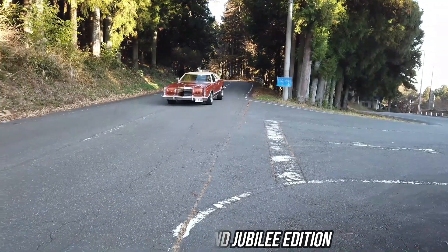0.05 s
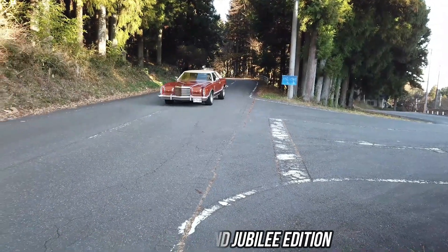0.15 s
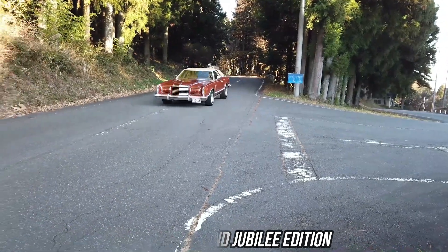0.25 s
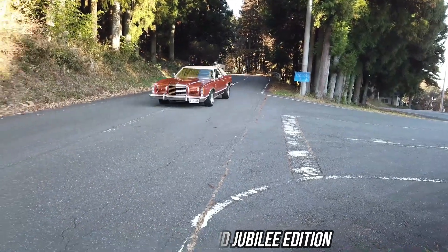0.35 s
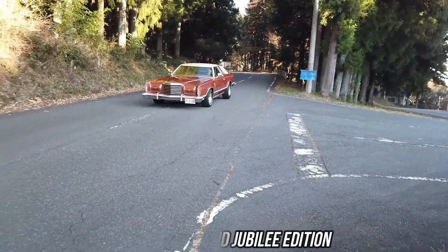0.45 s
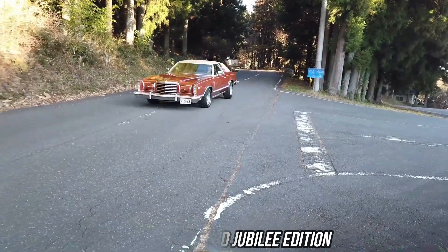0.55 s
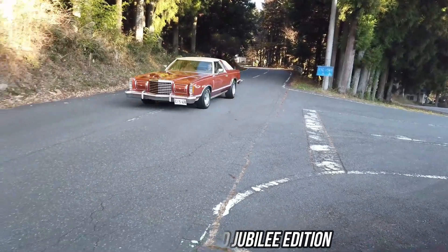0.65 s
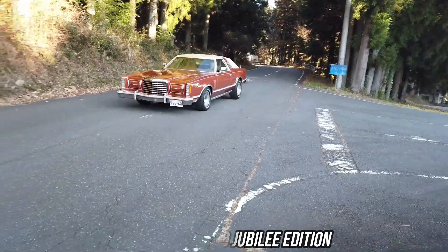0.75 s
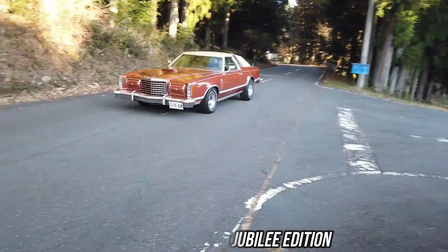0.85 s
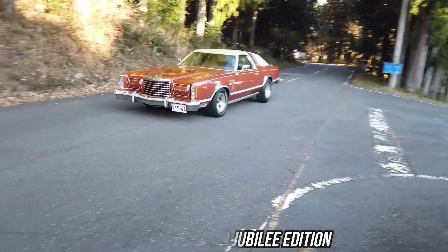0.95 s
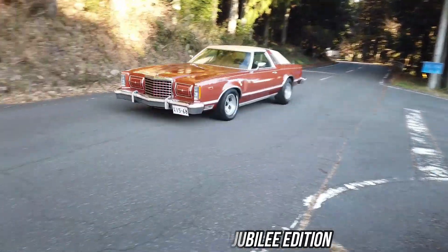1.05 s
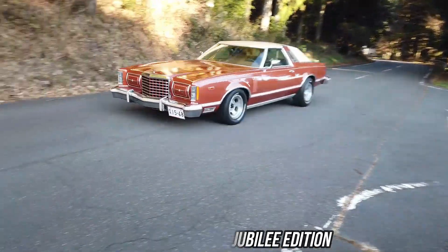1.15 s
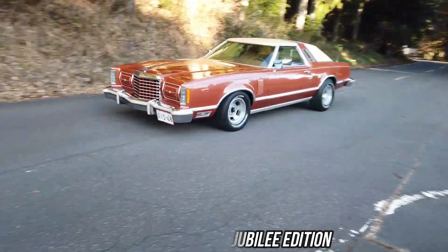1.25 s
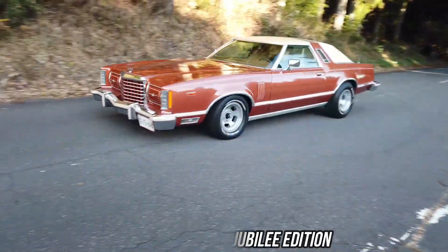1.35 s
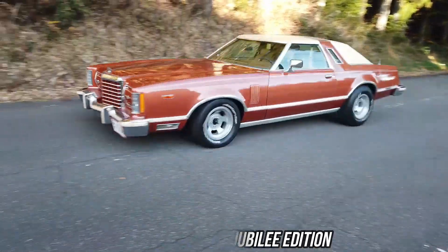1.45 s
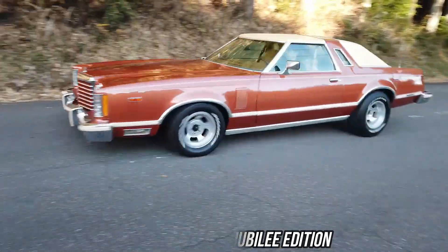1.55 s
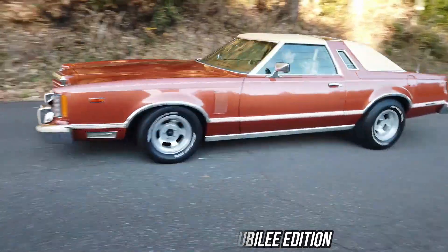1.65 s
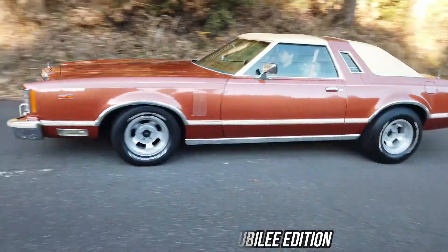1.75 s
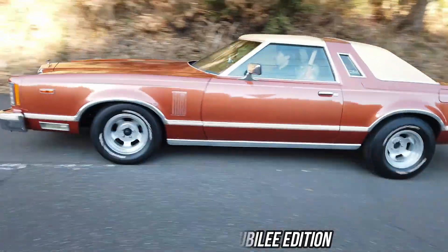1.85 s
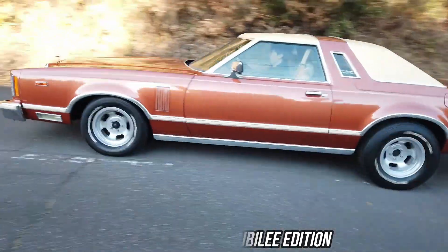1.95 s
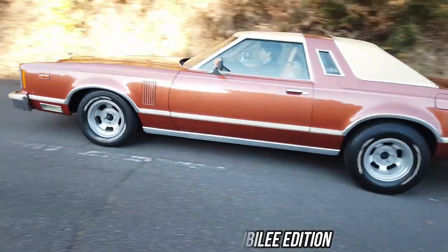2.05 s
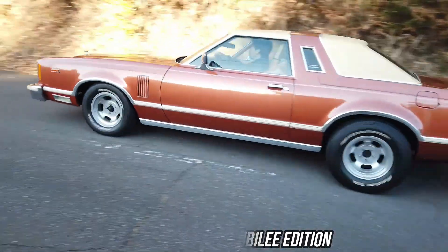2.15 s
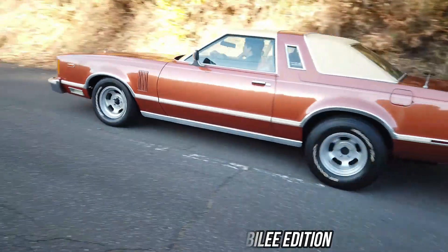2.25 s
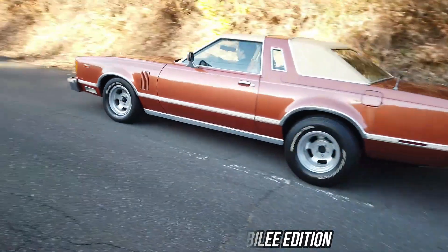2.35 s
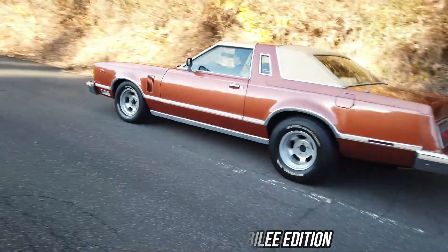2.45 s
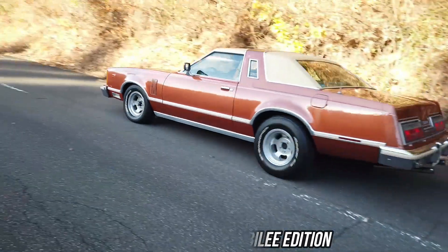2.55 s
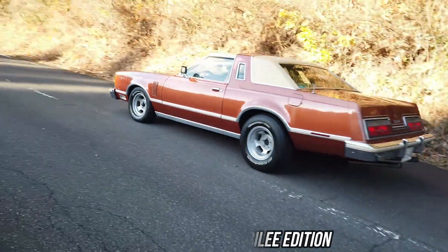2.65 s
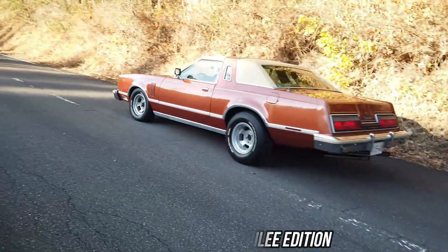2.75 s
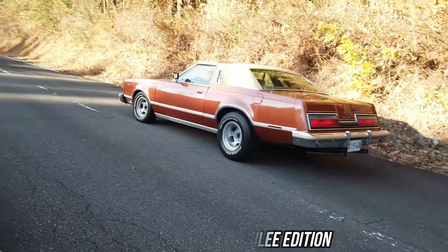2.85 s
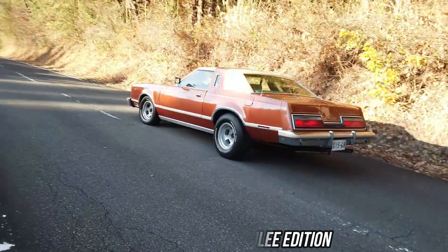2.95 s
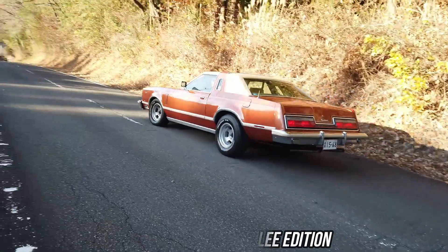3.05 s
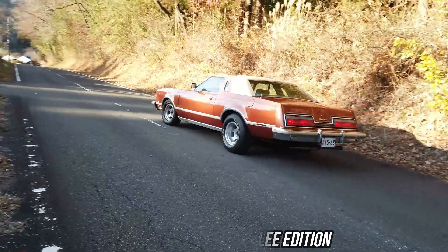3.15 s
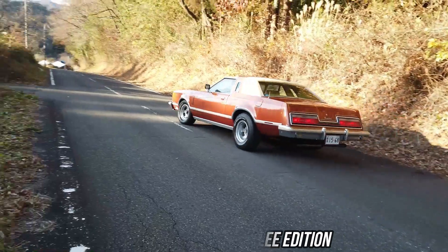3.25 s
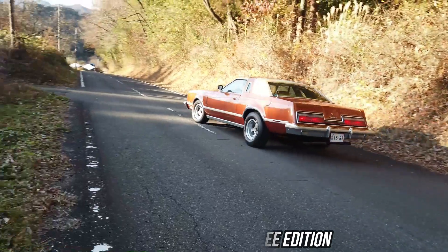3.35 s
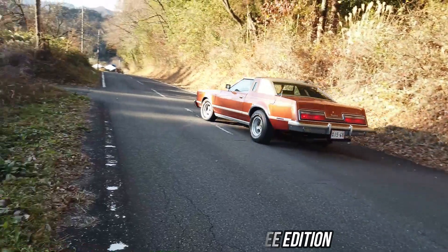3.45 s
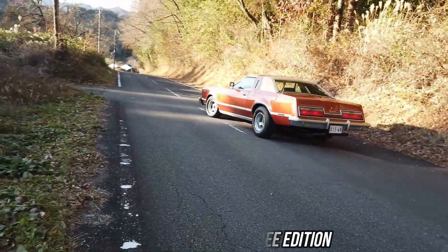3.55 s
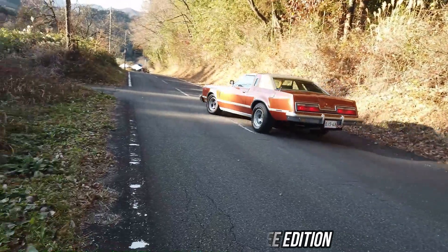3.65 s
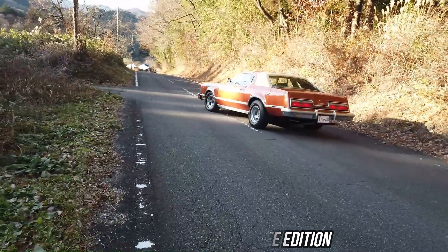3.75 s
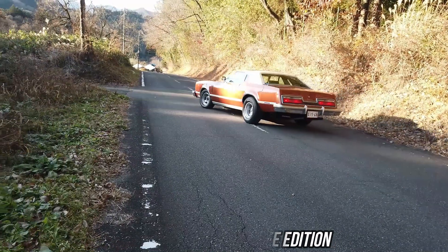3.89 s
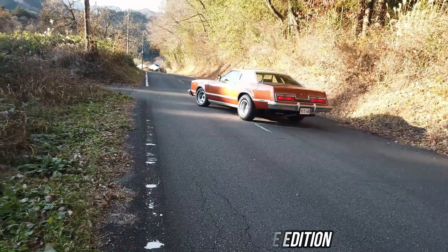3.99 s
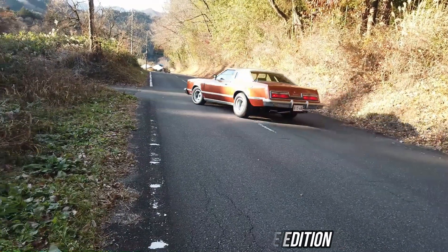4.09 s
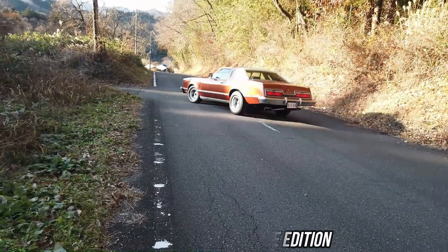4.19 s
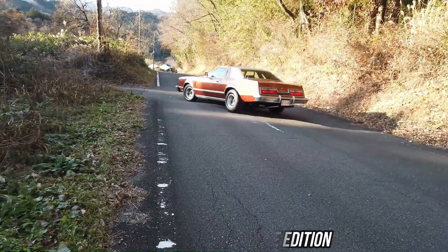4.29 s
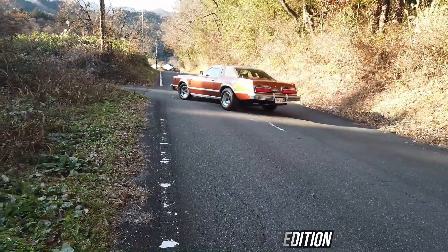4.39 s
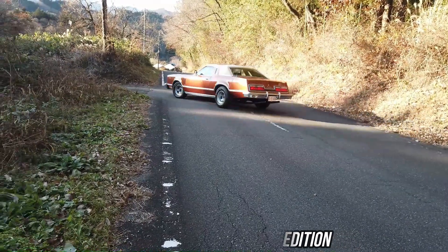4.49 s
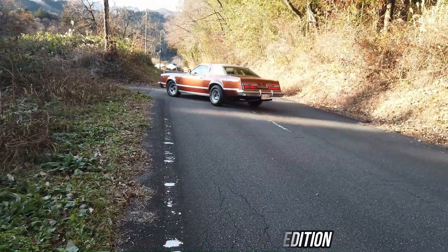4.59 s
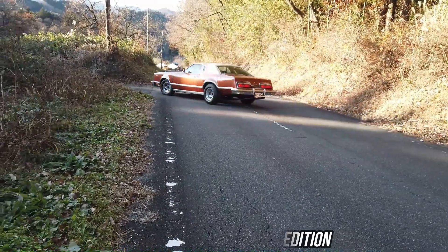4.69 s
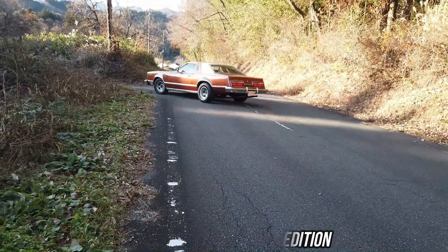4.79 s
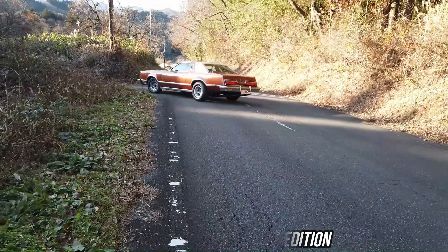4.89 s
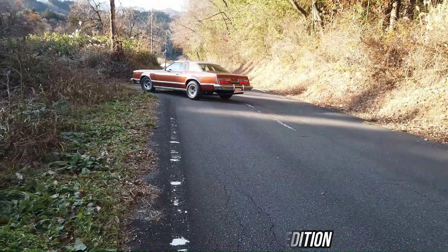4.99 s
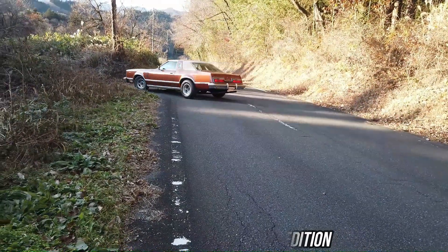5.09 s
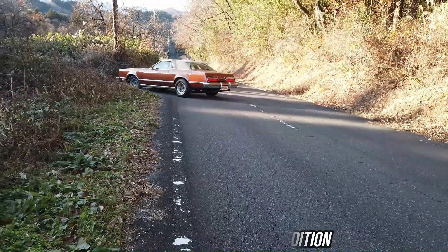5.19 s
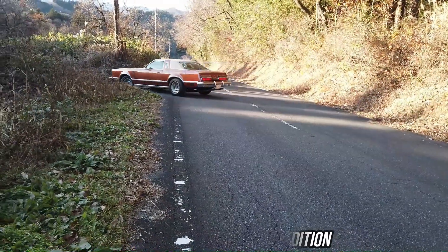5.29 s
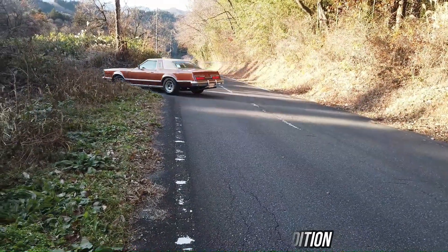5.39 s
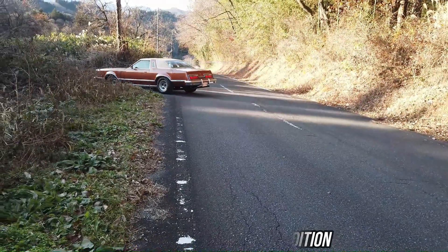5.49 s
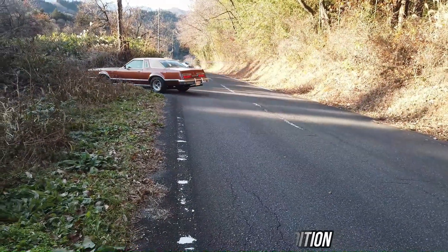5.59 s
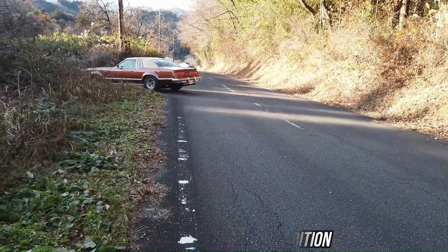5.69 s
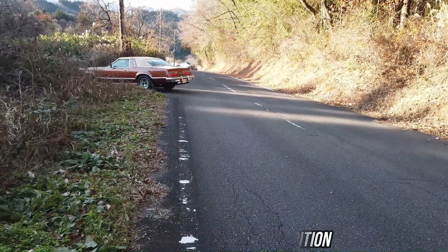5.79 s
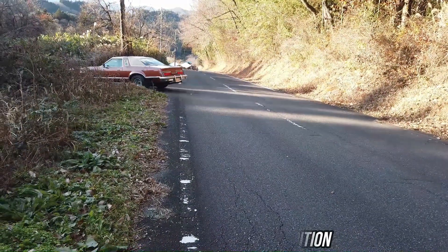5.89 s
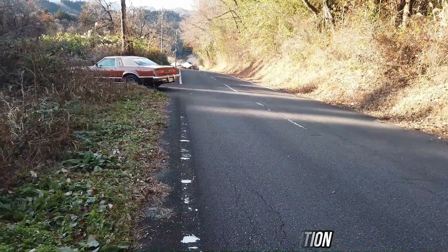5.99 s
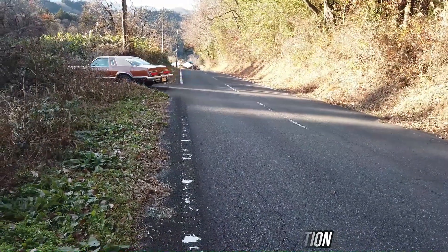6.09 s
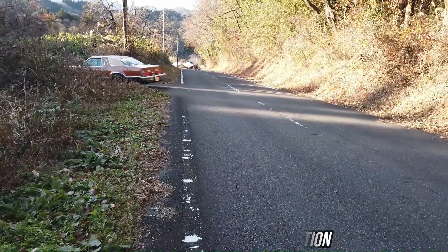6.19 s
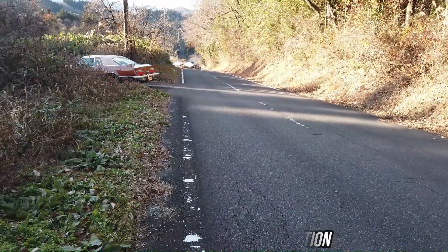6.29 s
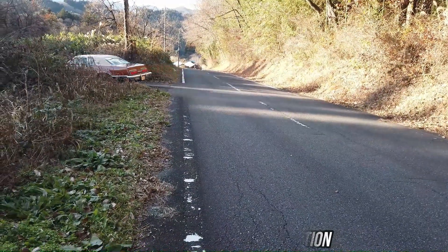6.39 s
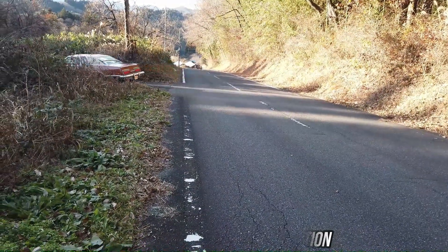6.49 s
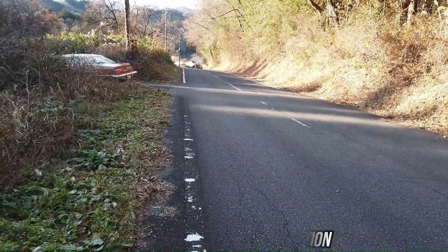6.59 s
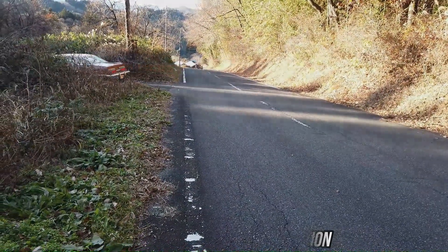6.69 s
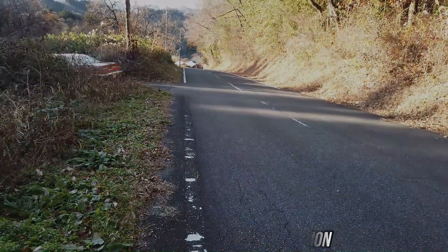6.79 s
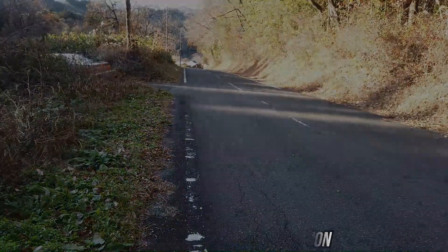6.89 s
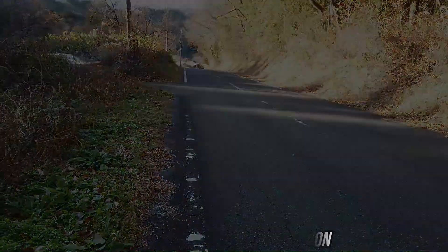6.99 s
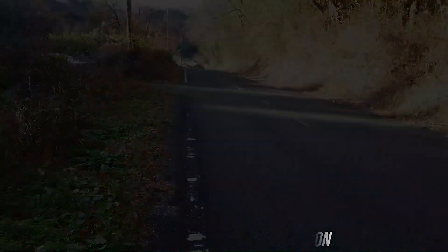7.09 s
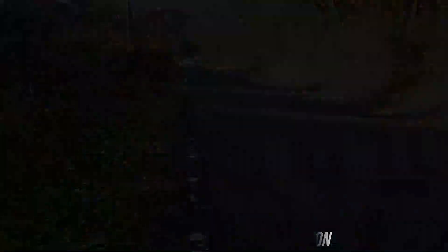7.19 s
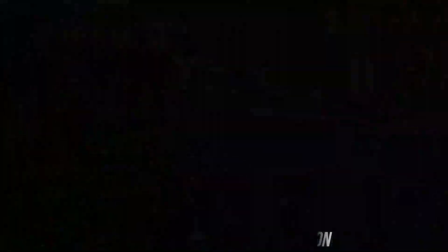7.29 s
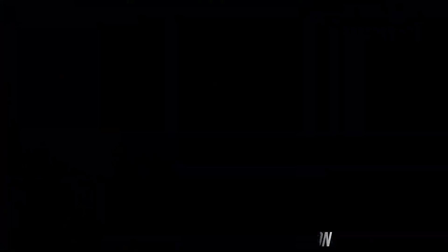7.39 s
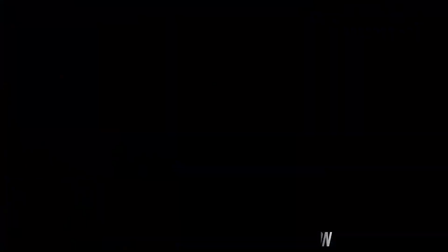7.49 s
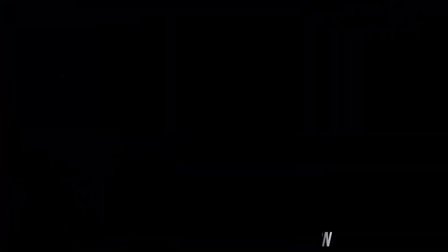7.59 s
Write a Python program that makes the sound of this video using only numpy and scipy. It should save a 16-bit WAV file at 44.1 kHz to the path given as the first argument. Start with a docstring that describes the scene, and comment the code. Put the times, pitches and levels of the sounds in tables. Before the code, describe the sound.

A big V8 car approaches with a hollow whirr, rumbles slowly past with droning exhaust and crackling grit, then fades away ticking behind bushes.

```python
"""A country road: a big V8 car rolls slowly past the microphone and turns off behind bushes.
Firing tones, uneven lines and pulsed gas noise make the exhaust; shaped noise makes the engine bay and tyre roar.
Bright snaps, mostly grit, and an exhaust leak ticking in firing order are short resonant noise bursts.
A short echo off a near surface colours tyres and leak; gusts push on the microphone over recorder hiss."""
import sys
import numpy as np
from scipy import signal
from scipy.fft import rfft, irfft, next_fast_len
from scipy.io import wavfile
from scipy.ndimage import uniform_filter1d, map_coordinates

SR = 44100
rng = np.random.default_rng(int(sys.argv[2]) if len(sys.argv) > 2 else 0)


def digitize_waveform(pressure):
    """Quantize a signal to 16-bit integers and store it at the path in sys.argv[1].

    Rows of a 2-D input are taken as channels; values are limited to [-1, 1].
    """
    field = np.atleast_2d(pressure).T
    bounded = np.clip(field, -1, 1)
    quanta = np.round(bounded * 32767).astype(np.int16)
    wavfile.write(sys.argv[1], SR, quanta)


N = 336924
TIME_S = np.arange(N) / SR


def amp(db):
    """Decibels to linear gain."""
    return 10 ** (np.asarray(db) / 20)


def unit(x):
    """Scale to rms 1."""
    return x / np.sqrt(np.mean(x ** 2) + 1e-20)


def along(points, hz):
    """Read (hz, level_db) points on a log frequency axis, practically silent outside."""
    point_hz, level_db = np.transpose(points)
    return np.interp(np.log(hz + 1), np.log(point_hz + 1), level_db, left=-120, right=-120)


def curves(rows):
    """Automation lanes: one value per sample for each column after the time."""
    time_s, *columns = np.transpose(rows)
    return [np.interp(TIME_S, time_s, column) for column in columns]


def wobble(rate):
    """A smooth random curve with rate knots a second."""
    knots = rng.standard_normal(int(N * rate / SR) + 4)
    return map_coordinates(knots, [np.arange(N) * rate / SR])


def bump(centre_s, half_s):
    """A smooth bell of height 1, down to 1/e at half_s either side."""
    return np.exp(-((TIME_S - centre_s) / half_s) ** 2)


def filtered(x, response):
    """Shape x by a gain that depends on frequency."""
    size = next_fast_len(N + SR // 2)
    return irfft(rfft(x, size) * response(np.fft.rfftfreq(size, 1 / SR)), size)[..., :N]


def rush(spectrum, patchy_db, apart=0., size=512):
    """Coloured noise, mid rms 1, in random gain patches; apart adds stereo width above 2.7 kHz."""
    grains = signal.stft(rng.standard_normal((2 if apart else 1, N)), nperseg=size)[2]
    # a larger size makes the patches narrower in pitch and longer in time
    patches = uniform_filter1d(rng.standard_normal(grains.shape[1:]), 3 + 1536 // size, 0)
    patches = uniform_filter1d(patches, 5120 // size + 1, 1)
    pair = signal.istft(grains * amp(patchy_db * unit(patches)), nperseg=size)[1][:, :N]

    def colour(hz):
        return amp(along(spectrum, hz)) * [hz > 0, apart * (hz > 2700)][:len(pair)]

    shaped = filtered(pair, colour)
    mid, side = shaped[0], shaped[1:].sum(0)
    return np.array([mid + side, mid - side]) / np.std(mid)


def burst(hz, width_hz, rise_s, t60_s):
    """A short puff of noise rung twice through one resonance, peak 1."""
    t = np.arange(SR // 20) / SR
    puff = rng.standard_normal(len(t)) * (1 - np.exp(-t / rise_s)) * amp(-60 * t / t60_s)
    for _ in range(2):
        puff = signal.lfilter(*signal.iirpeak(hz, hz / width_hz, SR), puff)
    return puff / np.max(abs(puff))


def aside(spread):
    """Left and right gains of one small event, a little off centre by chance."""
    return 1 + spread * rng.standard_normal() * np.array([[1], [-1]])


# Which side of the car faces us: time_s, side (0 front, 1 flank, 2 rear)
SIDE_SHOWN = [(0, 0.01), (.8, 0.24), (1.3, 0.58), (2.4, 1.11), (3.4, 2.003), (7.64, 1.94)]


def turning(spectra, patchy_db, apart=0., size=512):
    """Noise that crossfades at equal power between its front, flank and rear colours."""
    side, = curves(SIDE_SHOWN)
    total = 0
    for k, spectrum in enumerate(spectra):
        share = np.sqrt(np.clip(1 - abs(side - k), 0, 1))
        total = total + share * rush(spectrum, patchy_db, apart, size)
    return total


LIFT_S, LIFT_TAKES_S = 5.75, 0.33  # the load comes off the engine: middle and length of the fade


def by_side(front, flank, rear, coasting=None):
    """A value that follows the side shown, and fades to coasting (if given) as the load comes off."""
    value = np.interp(curves(SIDE_SHOWN)[0], np.arange(3), [front, flank, rear])
    if coasting is None:
        return value
    lifted = np.clip((TIME_S - LIFT_S) / LIFT_TAKES_S + .5, 0, 1)
    return value + lifted * (coasting - value)


# Slow push of the wind: time_s, level_db (rms)
WIND_PUSH = [(0, -36), (.4, -33), (.8, -38), (1.15, -24), (2.1, -20), (2.7, -24), (3.7, -23), (4.6, -28),
             (5.3, -38), (5.7, -27), (6.6, -34), (7.3, -34), (7.64, -50)]
# Single strong shoves: centre_s, pressure (full scale, signed), half_s
WIND_SHOVES = [(.125, -0.067, .03), (0.327, 0.078, .035), (.39, -0.072, .025), (4.11, 0.16, 0.04),
               (4.283, 0.26, 0.029), (4.384, -0.46, 0.037), (7.115, -0.12, 0.085), (7.198, 0.15, 0.053)]
# Gusts of faster flutter: centre_s, level_db (above a constant floor), half_s
WIND_GUSTS = [(0.11, -33.5, 0.023), (0.392, -30.5, 0.032), (1.08, -34.5, .06), (1.832, -20, 0.073),
              (4.251, -28.5, 0.33), (4.872, -29, 0.076), (6.09, -30, 0.063), (7.144, -36.5, 0.077)]


def wind():
    """Moving air presses on the membrane: slow pushes, a few strong shoves, faster flutter in gusts."""
    push = rush([(1.2, -8), (4, 0), (8, -6), (14, -18)], patchy_db=1)
    flutter = rush([(12, 20.0), (22, 5.0), (32, 7), (45, -32), (90, -4.5)], patchy_db=0.5)
    shoves = sum(pressure * bump(centre_s, half_s) for centre_s, pressure, half_s in WIND_SHOVES)
    gusts = amp(-55) + sum(amp(level_db) * bump(centre_s, half_s)
                           for centre_s, level_db, half_s in WIND_GUSTS)
    return amp(curves(WIND_PUSH)[0]) * push + shoves + gusts * flutter


# Colour of the recorder's hiss: pitch_hz, level_db (relative, per Hz)
HISS_FLOOR_COLOUR = [(300, -30), (405, 1), (990, 2.5), (1700, -14), (5500, -19), (12500, -18), (16000, -23)]


def recorder_hiss():
    """The recorder's faint, wide, steady hiss."""
    return amp(-73.5) * rush(HISS_FLOOR_COLOUR, patchy_db=2.0, apart=0.88)


# Loudness of the car: time_s, hiss_db (tread hiss, also its general loudness), fizz_db (grit fizz)
CAR_LEVELS = [(0, -57, -88), (.25, -53.5, -85), (.82, -51.5, -72.5), (1.2, -47, -69), (1.78, -43.5, -62),
              (2.3, -45.5, -59), (2.5, -46.5, -52), (2.98, -47.5, -61), (3.43, -49, -62.5),
              (3.64, -49.5, -53), (3.94, -54.5, -63.5), (4.21, -53.5, -66), (4.76, -61.5, -82),
              (5.1, -60.5, -78), (5.44, -67, -75.5), (6.9, -77, -91), (7.64, -83.5, -103)]
MIDDLE_DB = -50  # car loudness at which the rumble and roar base levels hold
# Two low hollow resonances, with two fainter peaks coloured by the short echo,
# each before the squared response: pitch_hz, width_hz, level_db
FRONT_PEAKS = [(870, 90, 1.5), (1228, 64, -0.5), (2950, 94, -25), (3400, 150, -26)]
BAY_CLIMB, CLIMB_S = .13, .6  # share by which the pitch rises, and the time it is half way


def engine_bay():
    """Fan and intake noise rings hollow in the bay, heard from the front, its pitch wavering and climbing."""
    climb = BAY_CLIMB * (1 + np.tanh((TIME_S - CLIMB_S) / .15)) / 2
    pace = 1 + climb + 0.01508 * wobble(7)

    def peaks(hz):
        total = sum(amp(level_db) * hz * width / (centre * centre - hz * hz + 1j * hz * width)
                    for centre, width, level_db in FRONT_PEAKS)
        return total ** 2

    ringing = unit(filtered(rng.standard_normal(N), peaks))
    # reading the noise faster raises its pitch
    moving = map_coordinates(ringing, [np.cumsum(pace)], mode="wrap")
    return amp(curves(CAR_LEVELS)[0] + by_side(13, -24, -42)) * moving


# Engine speed: time_s, rate_hz (firings a second)
FIRING_RATE = [(0.0, 55.5), (0.8, 54.5), (1.45, 52.4), (2.15, 50.4), (2.7, 49.8), (2.9, 47.09),
               (3.4, 47.68), (3.8, 45.21), (4.3, 48.36), (4.75, 45.4), (5.2, 47.13), (5.62, 48.07),
               (5.82, 54.78), (6.3, 54.45), (6.9, 52.36), (7.64, 52.93)]


def crank():
    """Phase of the firing in radians, one turn a firing, with a slightly unsteady crank."""
    unsteady = .002 * wobble(12)
    firings = np.cumsum(curves(FIRING_RATE)[0] * (1 + unsteady)) / SR
    return 2 * np.pi * (.03 + firings)  # starts .03 into the firing order


def line(angle, level_db, rough_db):
    """A sine whose rms level wavers at random by rough_db."""
    return np.sqrt(2) * amp(level_db + rough_db * wobble(18)) * np.sin(angle + rng.uniform(0, 2 * np.pi))


# Clean tones: time_s, drone_db (twice the firing rate), firing_db (the firing rate)
DRONE_LEVELS = [(0, -53.5, -58), (.65, -51, -54), (1.05, -34.5, -51), (1.45, -29.5, -44),
                (1.85, -24.5, -62), (2.15, -24, -35), (2.6, -24.5, -33), (3.3, -23, -36), (3.9, -28.5, -45),
                (4.25, -27.5, -33), (4.66, -37, -61), (5.25, -35.5, -51), (5.6, -40, -51),
                (5.9, -48.5, -44), (6.25, -52.5, -39), (6.8, -49.5, -52.5), (7.3, -59.5, -54),
                (7.64, -61.5, -65)]
# Overtones, over the drone: multiple (of the firing rate), front_db, flank_db, rear_db, coasting_db
DRONE_OVERTONES = [(3, -18, -9, -9, -1), (5, 0.5, -14.5, -17.5, -45)]
# Lines of uneven firing between cylinders: multiple (of the firing rate), level_db (over the rumble)
BURBLE_LINES = [(1.5, -18.5)]
# Gas noise colours for front, flank, rear: pitch_hz, level_db (relative, per Hz)
RUMBLE_COLOURS = [
    [(35, -32), (60, -34), (150, -2.5), (259, -3), (307, -22), (360, -33)],
    [(35, -33), (60, -4.5), (145, -4.5), (233, 2), (330, -10), (400, -45)],
    [(35, -32), (60, -7.5), (112, -6), (164, 5), (259, -18.5), (400, -25)],
]
RUMBLE_GROWS, RUMBLE_FOLLOWS = 0.62, 0.12  # dB of rumble for each dB of car loudness, of drone


def exhaust(phase):
    """Firing tones, lines from uneven cylinders, the silencer's hum, and gas noise puffed once a firing."""
    drone_db, firing_db = curves(DRONE_LEVELS)
    rumble_db = by_side(-38, -26.5, -33.5) + RUMBLE_GROWS * (curves(CAR_LEVELS)[0] - MIDDLE_DB)
    rumble_db = rumble_db + RUMBLE_FOLLOWS * (drone_db - drone_db.mean())

    firing = line(phase, firing_db, rough_db=by_side(.6, .6, .6, 1.5))
    drone = line(2 * phase, drone_db, rough_db=by_side(.78, .78, .78, 3.5))
    overtones = sum(line(multiple * phase, drone_db + by_side(*side_db), rough_db=2.0)
                    for multiple, *side_db in DRONE_OVERTONES)
    burble = sum(line(multiple * phase, rumble_db + level_db, rough_db=7.0)
                 for multiple, level_db in BURBLE_LINES)

    # the hum sits at 3.37 times the firing rate under load, 3.04 when coasting
    hum_hz = curves(FIRING_RATE)[0] * by_side(3.37, 3.37, 3.37, 3.04) + 3 * wobble(16)
    hum_db = rumble_db + by_side(-9.5, -11, -11, -6)
    hum = line(2 * np.pi * np.cumsum(hum_hz) / SR, hum_db, rough_db=2.5)

    gas = turning(RUMBLE_COLOURS, patchy_db=-1.0) * (1 + 0.24 * np.sin(phase))
    return firing + drone + overtones + burble + hum + amp(rumble_db - 2.5) * gas


# Echo-coloured band of the roar, rising in pitch as the echo delay shortens: time_s, pitch_hz, level_db
ECHO_BAND_SWEEP = [(.8, 600, -53.5), (1, 620, -41.5), (1.25, 739.8, -37), (1.6, 960, -42.5),
                   (2.1, 1000, -51)]


def echo_band():
    """The echo-coloured band of the roar: narrow noise carried on a sine that sweeps upward."""
    band_hz, band_db = curves([(0, 600, -90), *ECHO_BAND_SWEEP, (2.6, 1000, -90)])
    narrow = unit(filtered(rng.standard_normal(N), lambda hz: 1 / (1 + (hz / 150) ** 2)))
    return np.sqrt(2) * amp(band_db) * narrow * np.sin(2 * np.pi * np.cumsum(band_hz) / SR)


# Roar and hiss colours for front, flank, rear: pitch_hz, level_db (relative, per Hz)
ROAR_COLOURS = [
    [(250, -35), (346, 0.5), (494, -4), (600, -5), (880, 1), (1070, -2), (1240, -6.5), (1800, -28.5),
     (2300, -25)],
    [(250, -37), (300, -3.5), (400, 2.5), (750, -8.5), (1030, -7), (1800, -28.5), (2300, -65)],
    [(250, -3.5), (388, 1.5), (551, -6), (958, -8.5), (1320, -14.5), (1800, -43), (2300, -65)],
]
HISS_COLOURS = [
    [(1100, -10.5), (1500, -7.5), (2750, -20.5), (4000, -27.5), (6300, -33), (8500, -54)],
    [(1100, -30), (1500, 3.5), (2600, -3), (3770, -11), (5400, -7.5), (8500, -16.5), (9500, -17)],
    [(1100, -10), (1500, 11), (1900, 6.5), (2700, 3.5), (3620, 0), (4900, 2), (6200, -2), (7200, -5.5),
     (8800, -8.5), (9800, -20)],
]
# Fizz and its brightest part: pitch_hz, level_db (relative, per Hz)
FIZZ_COLOUR = [(6000, -3), (7200, -1), (8300, 3), (9000, -2), (10000, -12), (11000, -40)]
BRIGHT_COLOUR = [(9000, -14), (10000, -9.5), (13500, -6), (15200, -16), (16000, -10)]
# Patches of loose grit: centre_s, rise_db (of the fizz), half_s
GRIT_SURGES = [(2.348, 8, 0.054), (2.425, 13, 0.018), (2.578, 5.5, 0.02), (2.737, 4, .025)]
ROAR_GROWS, BRIGHT_GROWS = 1.042, 0.85  # dB for each dB of car loudness
BRIGHT_ENDS_S, BRIGHT_LOSS_DB = 3.92, -8  # the brightest fizz drops away as the car draws off


def tyres(phase):
    """Streaky roar that throbs with the firing, plus tread hiss and fizz that come in clumps."""
    hiss_db, fizz_db = curves(CAR_LEVELS)
    loudness_db = hiss_db - MIDDLE_DB
    roar_db = by_side(-38, -33.5, -36.5, -37) + ROAR_GROWS * loudness_db
    # the brightest part is lost first with distance
    bright_db = fizz_db + by_side(-0.5, -8.5, -3) + BRIGHT_GROWS * loudness_db
    bright_db = bright_db + BRIGHT_LOSS_DB * np.clip((TIME_S - BRIGHT_ENDS_S) / .15 + .5, 0, 1)

    clumps = wobble(25.12) + 1.28 * wobble(90)
    surge_db = sum(rise_db * bump(centre_s, half_s) for centre_s, rise_db, half_s in GRIT_SURGES)
    bright_db = bright_db + surge_db + 0.95 * clumps + 0.22 * wobble(9)

    roar = amp(roar_db) * turning(ROAR_COLOURS, patchy_db=1.94, size=2048) * (1 + 0.12 * np.sin(phase))
    hiss = amp(hiss_db + 0.63 * clumps) * turning(HISS_COLOURS, patchy_db=2.5, apart=0.32)
    fizz = amp(fizz_db + surge_db + 1.6 * clumps) * rush(FIZZ_COLOUR, patchy_db=3.0, apart=0.27)
    bright = amp(bright_db) * rush(BRIGHT_COLOUR, patchy_db=3.0, apart=0.48)
    return echo_band() + roar + hiss + fizz + bright


# Strength of each cylinder's puff in firing order: level_db (relative), bright_db (bright part over it)
CYLINDER_PUFFS = [(8, -8), (4, -7), (6, -7), (5, -8), (0, -5), (6.5, -2), (-5, -6), (-7, -3)]
# The strongest puffs: start_s, level_db (peak of the main part before panning), pitch_hz
STRONG_PUFFS = [(3.0677, -35, 4600), (3.238, -38, 5000), (3.3423, -46, 4990), (3.4068, -34.5, 4830),
                (3.572, -44, 5000), (3.688, -41, 4700), (3.754, -42.5, 4400), (3.9237, -39, 4860),
                (3.9923, -44, 4650), (4.0323, -40.5, 4850), (4.1, -40, 4770), (4.202, -42, 4600),
                (4.264, -40.5, 4860), (4.4323, -43, 5120), (4.6034, -42.5, 5230), (4.671, -47, 5200),
                (4.7765, -48.5, 4800), (4.951, -46, 5060), (5.1226, -48, 4670), (5.463, -54, 5200),
                (5.7848, -59, 5090), (5.879, -50.5, 5130), (5.9335, -51.5, 5070), (6.1704, -57, 4920),
                (6.2248, -55, 4610), (7.1277, -61, 4660), (7.2774, -67, 5060)]
# Colour of the spitting gas: pitch_hz, level_db (relative, per Hz)
SPIT_COLOUR = [(2000, 6), (2700, -3), (3600, -40), (4900, -1), (6200, -7), (7200, -1.5), (9000, -32)]
LEAK_WANDERS_DB, PUFF_SCATTER_DB, OTHER_PUFFS_DB = 2, 2, 1  # slow drift, spread and lift of the puffs
LEAK_HIDDEN_S = 7.36  # from here the leak drops by 12 dB


def leak(phase):
    """Gas spits through a small gap in the pipe at every firing, strongest from behind."""
    out = np.zeros((2, N + SR))
    firing = phase / (2 * np.pi)
    hidden_db = -12 * np.clip((TIME_S - LEAK_HIDDEN_S) / .1, 0, 1)
    leak_db = curves(CAR_LEVELS)[0] + by_side(-30, -16, 0, 2)
    heard = amp(leak_db + LEAK_WANDERS_DB * wobble(2.865) + hidden_db)

    puffs = [(round(start_s * SR), amp(level_db), hz, -10) for start_s, level_db, hz in STRONG_PUFFS]
    strong_at = np.array([puff[0] for puff in puffs])
    for at in np.flatnonzero(np.diff(firing // 1)):
        level_db, bright_db = CYLINDER_PUFFS[int(firing[at + 1]) % len(CYLINDER_PUFFS)]
        gain = heard[at] * amp(level_db + OTHER_PUFFS_DB + PUFF_SCATTER_DB * rng.standard_normal())
        clear = abs(strong_at - at).min() > SR // 90  # silent right beside a strong puff
        puffs.append((at, gain * clear, rng.normal(4950, 380), bright_db))

    for at, gain, hz, bright_db in puffs:
        puff = burst(hz, 1000, .002, .045)
        puff = puff + amp(bright_db) * burst(rng.normal(7600, 500), 1500, .002, .03)
        out[:, at:][:, :len(puff)] += aside(0.35) * gain * puff

    # a softer spit swells and fades within each firing, its size drawn afresh each time
    size_db = 4 * rng.standard_normal(int(firing[-1]) + 1)[firing.astype(int)]
    within = firing % 1
    gate = within * np.exp(-within / 0.5) * amp(size_db)
    spits = unit(gate) * rush(SPIT_COLOUR, patchy_db=4.5, apart=0.8)
    return out[:, :N] + heard * amp(-11) * spits


# Second path by a near surface: time_s, delay_ms (extra), strength (0-1, before the band colour)
ECHO_PATH = [(0, 2.04, .35), (.35, 2.02, .35), (.7, 1.7, .35), (1.35, 1.28, .55), (1.6, 1.16, .55),
             (1.9, 1.1, .35), (2.2, .98, .3), (2.55, 1.1, .25), (3.2, 2.03, .4), (3.8, 2.55, .35),
             (4.2, 2.72, .5), (4.65, 2.58, .8), (5.2, 2.72, .75), (5.5, 2.57, .7), (5.9, 2.7, .5),
             (7.64, 2.3, .1)]


def echoed(x):
    """The middle range arrives twice, so bright and dark bands slide as the car moves."""
    delay_ms, strength = curves(ECHO_PATH)
    late = np.arange(N) - delay_ms * SR / 1000
    colour = [(300, 5), (650, -8), (1200, -13), (1900, -1), (3800, 0), (6500, -9)]
    band = filtered(x, lambda hz: amp(along(colour, hz)))
    again = np.array([map_coordinates(channel, [late]) for channel in band])
    return (x + strength * again) / np.sqrt(1 + strength ** 2)


# Bright snaps: grit under the tread, and the last few the crisp edge of exhaust ticks:
# start_s, level_db (peak of the bright part before panning)
BRIGHT_SNAPS = [(0.9485, -48), (1.8081, -44), (2.3953, -37), (2.4093, -29), (2.557, -32), (2.5772, -28),
                (2.677, -32.5), (2.69, -32.5), (2.847, -32.5), (2.8991, -30.5), (2.976, -37),
                (3.111, -34.5), (3.5087, -39), (3.831, -34.5), (4.016, -41.5), (4.2, -45), (4.4132, -46)]
SMALL_STONES, SMALL_DB, SMALL_SPREAD_DB = 220, 5, 2.5  # count, least level over the fizz, mean extra


def bright_snaps():
    """Each snap cracks in milliseconds, bright and dull at once; small stones fall at random times."""
    out = np.zeros((2, N + SR))
    fizz_db = curves(CAR_LEVELS)[1]
    small = [(at / SR, fizz_db[at] + SMALL_DB + SMALL_SPREAD_DB * rng.exponential())
             for at in rng.integers(N, size=SMALL_STONES)]
    for start_s, level_db in BRIGHT_SNAPS + small:
        dull = burst(rng.normal(8300, 400), 3500, .0004, .011)
        crack = burst(12300, 19000, 0.00022, 0.0063) + amp(rng.normal(-1.4, 0.61)) * dull
        out[:, round(start_s * SR):][:, :len(crack)] += amp(level_db) * aside(0.09) * crack
    return out[:, :N]


# Duller crunches under the near tyre: start_s, level_db (peak)
TYRE_CRUNCHES = [(1.967, -35), (2.014, -35), (2.4274, -33), (2.577, -35), (3.516, -44), (3.752, -39)]
# Brief pings under the car: start_s, level_db (peak), pitch_hz
CAR_PINGS = [(2.648, -39.5, 2150), (4.183, -45, 2240), (4.583, -52.5, 2720), (5.077, -54, 2980)]


def crunches_and_pings():
    """Dull, broadly tuned crunches and short, nearly pure notes, perhaps stones on the underbody."""
    out = np.zeros(N + SR)
    notes = [(start_s, level_db, burst(hz, 120, .003, .05)) for start_s, level_db, hz in CAR_PINGS]
    notes += [(start_s, level_db, burst(2600, 2000, .002, .035)) for start_s, level_db in TYRE_CRUNCHES]
    for start_s, level_db, note in notes:
        out[round(start_s * SR):][:len(note)] += amp(level_db) * note
    return out[:N]


def scene():
    """Mix the layers; only tyres and leak pass through the echo."""
    phase = crank()
    engine = engine_bay() + exhaust(phase)
    road = echoed(tyres(phase) + leak(phase))
    return wind() + recorder_hiss() + engine + road + bright_snaps() + crunches_and_pings()


def record(dry):
    """A steep low-pass keeps nothing above the band limit."""
    return filtered(dry, lambda hz: hz < 15950)


dry = scene()
out = record(dry)
digitize_waveform(out)
```